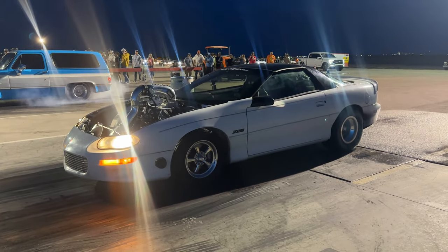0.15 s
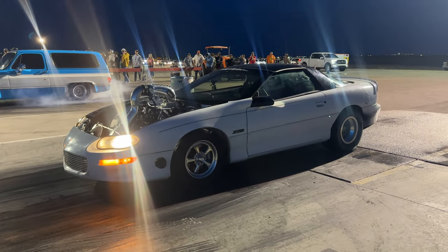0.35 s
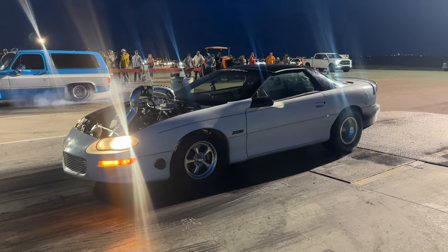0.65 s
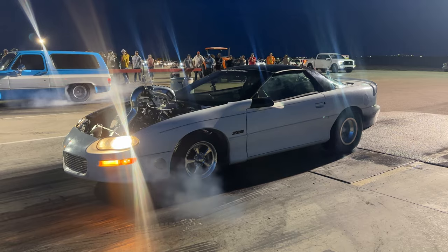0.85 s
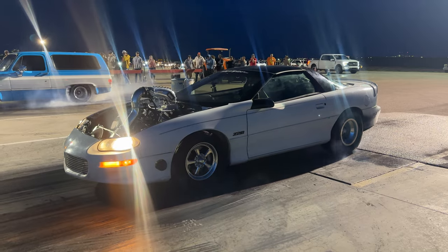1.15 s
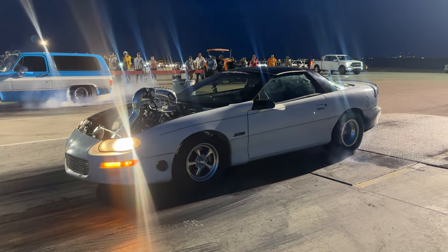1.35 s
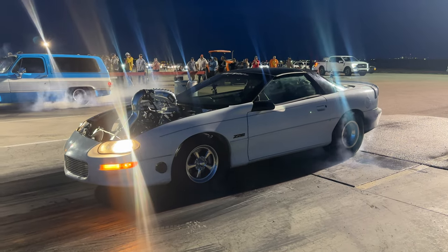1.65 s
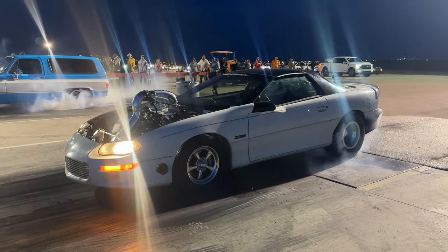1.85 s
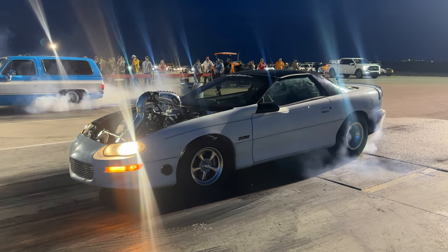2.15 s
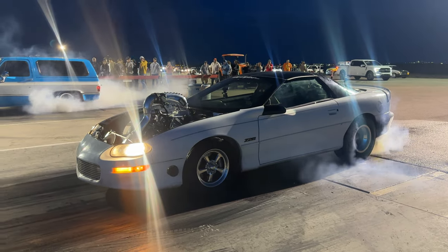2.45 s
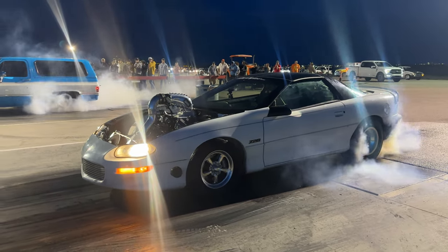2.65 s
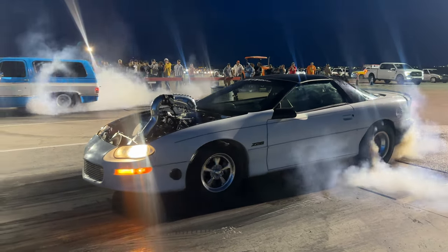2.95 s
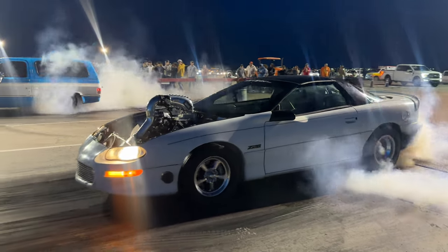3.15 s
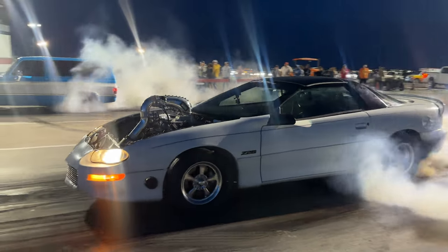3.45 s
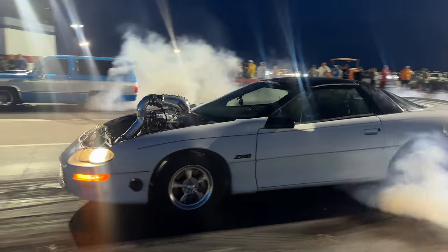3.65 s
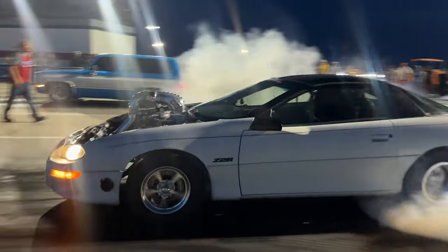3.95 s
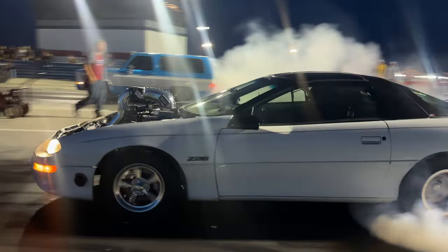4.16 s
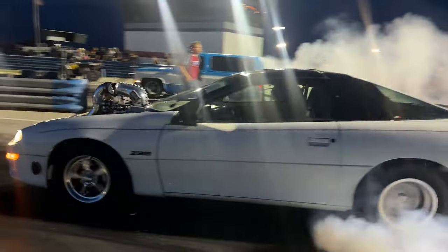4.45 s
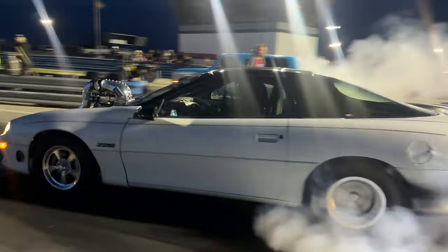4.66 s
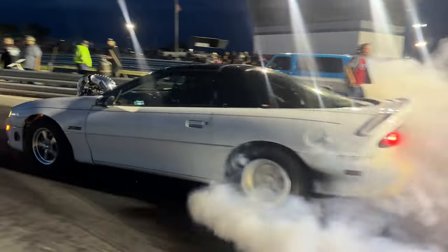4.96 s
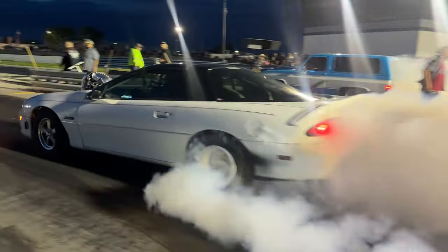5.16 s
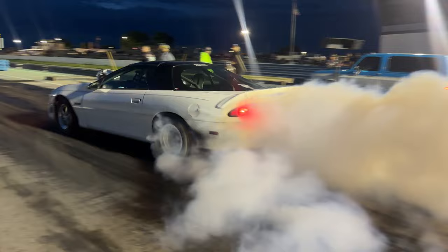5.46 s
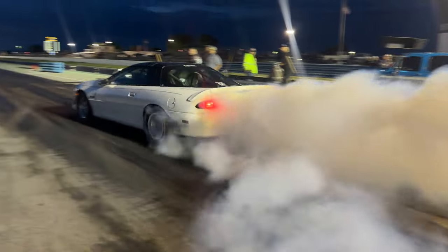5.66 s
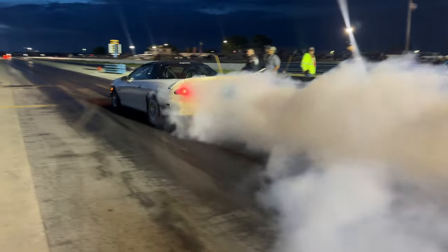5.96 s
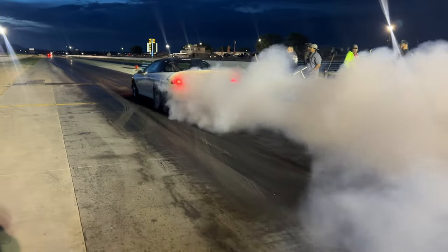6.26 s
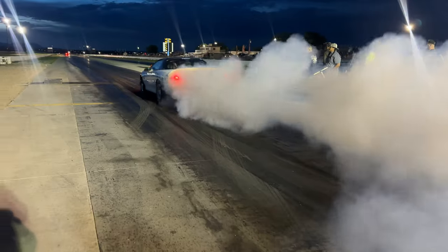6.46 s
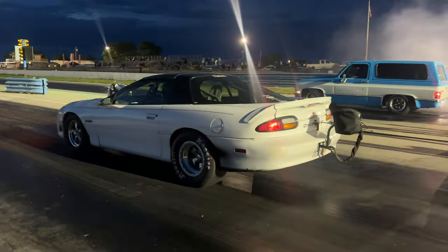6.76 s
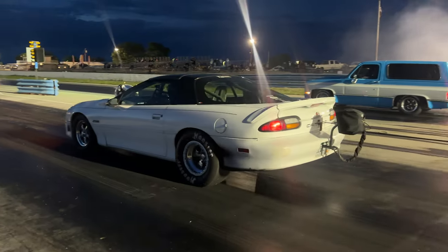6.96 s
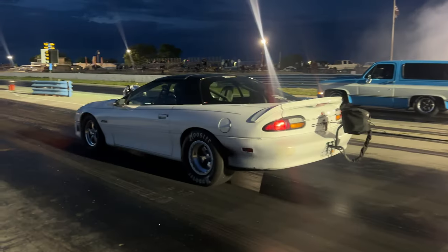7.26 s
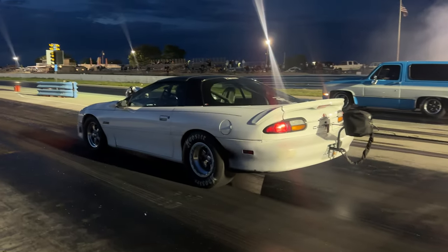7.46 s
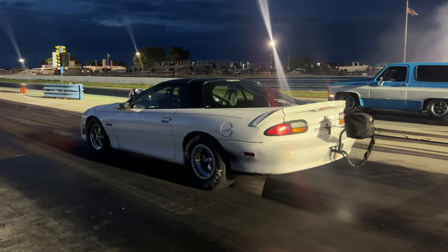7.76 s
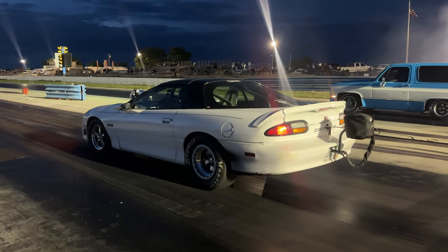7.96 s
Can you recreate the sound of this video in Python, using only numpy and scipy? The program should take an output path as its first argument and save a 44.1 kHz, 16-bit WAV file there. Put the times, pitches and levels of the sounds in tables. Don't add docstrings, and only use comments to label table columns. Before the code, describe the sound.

Lumpy V8 with popping exhaust climbs to a hard steady roar with tyre howl, fades with a short blow-off hiss, then cuts to rough idle.

```python
import sys
import numpy as np
from scipy import signal
from scipy.fft import rfft, irfft, next_fast_len
from scipy.io import wavfile
from scipy.ndimage import uniform_filter1d

SR = 44100
rng = np.random.default_rng(int(sys.argv[2]) if len(sys.argv) > 2 else 0)


def generate_wav(sig):
    pcm = np.round(np.clip(np.atleast_2d(sig).T, -1, 1) * 32767).astype(np.int16)
    wavfile.write(sys.argv[1], SR, pcm)


def boost_factor(decibels):
    exponent = np.asarray(decibels, float) / 20
    return 10 ** exponent


N = 357651
SIZE = next_fast_len(N + SR)
HZ = np.maximum(np.arange(SIZE // 2 + 1) * SR / SIZE, 1)
TIME = np.arange(N) / SR


def rms_one(x):
    return x / np.sqrt(np.mean(x ** 2) + 1e-20)


def in_time(rows):
    s, *columns = np.transpose(rows)
    on = (TIME >= s[0]) & (TIME <= s[-1])
    return [np.interp(TIME, s, column) for column in columns] + [on]


def at_hz(points, hz=HZ):
    table_hz, value = np.array(points).T
    return np.interp(np.log(hz), np.log(table_hz), value)


def colour(x, points, size=8192):
    hz = np.maximum(np.arange(size // 2 + 1) * SR / size, 1)
    cepstrum = irfft(np.log(boost_factor(at_hz(points, hz))), size)
    cepstrum[1:size // 2] *= 2
    cepstrum[size // 2 + 1:] = 0
    taps = irfft(np.exp(rfft(cepstrum)), size)[:size // 2]
    taps = taps.reshape((1,) * (x.ndim - 1) + (-1,))
    return signal.oaconvolve(x, taps, axes=-1)[..., :N]


def butter(x, order, hz, kind):
    return signal.sosfilt(signal.butter(order, hz, kind, fs=SR, output="sos"), x)


def even(x, span_s):
    return x / np.sqrt(uniform_filter1d(x ** 2, int(span_s * SR)) + 1e-9)


def clicks(times, sizes):
    out = np.zeros(N)
    at = np.clip((np.asarray(times) * SR).astype(int), 0, N - 1)
    np.add.at(out, at, sizes)
    return out


def fade(x, t60):
    return signal.lfilter([1], [1, -boost_factor(-60 / (t60 * SR))], x + 1e-18)


def noise_pair():
    return rng.standard_normal((2, N))


def wavering(hz, width_hz):
    slow = signal.lfilter(*signal.butter(1, width_hz / 2, fs=SR), noise_pair())
    carrier = np.exp(2j * np.pi * np.cumsum(hz) / SR)
    return rms_one(np.real((slow[0] + 1j * slow[1]) * carrier))


def mode_poles(hz, width_hz):
    r = np.exp(-np.pi * width_hz / SR)
    return r, [1, -2 * r * np.cos(2 * np.pi * hz / SR), r * r]


def resonance(x, hz, width_hz):
    r, poles = mode_poles(hz, width_hz)
    return signal.lfilter([(1 - r * r) / 2, 0, (r * r - 1) / 2], poles, x)


def hold_back(x, hz, width_hz):
    _, poles = mode_poles(hz, width_hz)
    return signal.lfilter(poles[::-1], poles, x)


# (t/s, engine cycles per s)
SPEED = [(0.05, 26.5), (0.15, 27.9), (0.3, 28.5), (0.43, 29.3), (0.55, 31), (0.66, 31.5), (0.8, 26.3),
         (0.87, 26.4), (1.0, 28.5), (1.1, 29.9), (1.2, 31), (1.3, 34), (1.44, 36.2), (1.57, 39.3),
         (1.65, 42.1), (1.82, 48.5), (1.97, 53.8), (2.05, 55.1), (2.11, 49.2), (2.32, 49.5), (2.62, 47.4),
         (2.78, 42.3), (2.9, 41.6), (3.05, 41.7), (3.47, 46.1), (3.71, 45.5), (3.97, 49.5), (4.24, 51.3),
         (4.55, 50.3), (4.72, 47.8), (4.87, 43.7), (5.02, 40.3), (5.27, 34.4), (5.56, 27.6)]


def crank():
    cycle_hz = in_time(SPEED)[0]
    start_cycle = 0.99
    return cycle_hz, start_cycle + np.cumsum(cycle_hz) / SR


SHUT_S = 5.47


def throttle_db():
    lift_s, length_s, fall_s = 0.675, 0.123, 0.075
    lift = np.clip((TIME - lift_s) / fall_s, 0, 1) * (TIME < lift_s + length_s)
    return -20 * lift - 290 * np.maximum(TIME - SHUT_S, 0)


# (delay/ms, gain)
ECHOES = [
    (1.9, 0.29),
    (5.3, -0.15),
    (9.1, -0.18),
    (14.7, -0.2),
    (23, 0.27),
]


def exhaust(push, pipe, split_hz, breath_db, clean_db, echo_db):
    breath = boost_factor(breath_db) * fade(np.abs(push), t60=0.062) * rng.standard_normal(N)
    burst = breath - (1 - boost_factor(clean_db)) * push
    gas = push + butter(burst, 2, split_hz, "high")
    delay_ms, gain = np.transpose(ECHOES)
    paths = clicks(np.append(0, delay_ms / 1000), np.append(1, gain * boost_factor(echo_db)))
    echoed = signal.oaconvolve(gas, paths[:2000])[:N]
    return even(colour(echoed, pipe), span_s=.13)


# (exhaust level/dB, pipe delay/ms, hiss level/dB, exhaust level from behind/dB)
CYLINDERS = [
    (-11, 1.37, -39, -32),
    (-12.5, 0.49, -9, -25),
    (1.26, 0.83, 6, 1.5),
    (-71, 0.9, -16, -43),
    (1, 0.47, -3.5, 0.5),
    (-3.5, 0.37, -23, -2),
    (-35, 1.67, -18, -40),
    (-2.5, 0.87, -5, -3),
]
BEHIND_S, BEHIND_TAKES_S = 4.6, 0.35


def firings(cycle, far_bank, passed, rough_db):
    slot = np.floor(8 * cycle).astype(int)
    at = np.flatnonzero(np.diff(slot)) + 1
    push_db, delay_ms, spit_db, behind_db = np.array(CYLINDERS)[slot[at] % 8].T
    strength = (1 - passed[at]) * boost_factor(push_db) + passed[at] * boost_factor(behind_db) + far_bank[at]
    luck = rng.standard_normal((len(at), 3)) * rough_db[at, None]
    lope_db = 0.8 * rough_db[at] * rng.standard_normal(400)[slot[at] // 8]
    when = at / SR + (delay_ms + 0.043 * luck[:, 0]) / 1000
    push = clicks(when, strength * boost_factor(luck[:, 1] + lope_db))
    spit = clicks(when, boost_factor(spit_db + 1.2 * luck[:, 2]))
    return push, spit


# (t/s, exhaust level/dB, pipe facing us/dB, share of the far bank)
LOAD = [(0.3, -16, -3.5, -0.063), (0.66, -15, -1, -0.041), (0.87, -21, -1, 0), (1.47, -15.5, 1, -0.14),
        (1.75, -13.5, 1.5, 0.51), (1.99, -10.5, 3, 0.073), (2.11, -10.5, 4, 0.19), (2.3, -14, 4, 0.46),
        (2.6, -15, 2, 0.22), (2.8, -16, 2.5, 0.1), (3.05, -17, 2, -0.055), (3.47, -15.5, -0.5, 0.097),
        (3.8, -16.5, -4.5, -0.078), (4.1, -16.5, -5.5, 0.089), (4.4, -17, -2.5, 0.23),
        (4.65, -19.5, -5, -0.1), (4.91, -24, -5, -0.088), (5.56, -31, -8, -0.29)]
# (engine cycles per s, spread/dB)
ROUGH = [(33, 2.3), (41, 1.7), (42.5, .8), (50, .6)]
# (f/Hz, level/dB per Hz)
PIPE = [(20, -85), (40, -19.5), (70, -2.5), (110, -1), (160, 0), (220, 5), (280, 5.5), (350, 0),
        (450, -9.5), (600, -14.5), (800, -17), (1000, -25), (1200, -28.5), (1420, -22.5), (1650, -41),
        (3000, -59.5)]
# (f/Hz, level/dB per Hz)
RUMBLE = [(18, -53), (30, -36), (80, -10), (194, -26), (276, -6), (462, -18.5), (748, -9.5), (878, -21),
          (1400, -43), (1820, -69), (3080, -120)]
# (f/Hz, level/dB per Hz)
GAS = [(900, -25), (1300, -2), (1700, 3), (2100, 3), (2650, -4.5), (5180, -3), (7350, -8), (8360, -0.5),
       (9490, -4.5), (11300, -35), (12400, -13), (15000, -7.5), (16000, -19), (16500, -77)]
# (t/s, extra path/ms, gain)
BOUNCE = [
    (1.5, 1.1, .05),
    (2.45, 0.87, 0.33),
    (2.85, 1.11, 0.42),
    (3.2, 0.92, 0.37),
    (3.6, 1.2, 0.098),
    (4.3, 0.93, 0.21),
    (4.72, 1.44, 0.17),
    (4.95, 2.46, 0.63),
    (5.2, 2.4, 0.18),
    (5.5, 2.17, 0.26),
]


def loaded_engine():
    cycle_hz, cycle = crank()
    exhaust_db, facing_db, far_bank, _ = in_time(LOAD)
    on = TIME < LOAD[-1][0]
    passed = np.clip((TIME - BEHIND_S) / BEHIND_TAKES_S, 0, 1)
    shut_db = throttle_db()
    exhaust_db = exhaust_db + shut_db
    hiss_db = exhaust_db - 25.5 + 0.53 * facing_db - 0.67 * shut_db * (TIME < SHUT_S) - 2.5 * passed
    boom_db = -0.18 * (cycle_hz - 40) - 0.022 * facing_db + 7 * passed
    boom_db = boom_db - 0.43 * shut_db * (TIME < BEHIND_S)
    bark_db = 4.5 + 0.67 * facing_db
    drone_db = np.interp(TIME, [1.27, 1.27 + 0.19], [4.5, -40])
    rough_db = np.interp(cycle_hz, *np.transpose(ROUGH))
    rough_db = np.where(TIME < 2, rough_db, np.minimum(rough_db, 1.0))

    push, spit = firings(cycle, far_bank, passed, rough_db)
    tone = exhaust(push, PIPE, split_hz=500, breath_db=-43, clean_db=0, echo_db=-10)
    tone = hold_back(tone, hz=250, width_hz=160)
    boom = butter(tone, 2, 185, "low")
    bark = butter(tone, 2, 480, "high")
    tone = tone + (boost_factor(boom_db) - 1) * boom + (boost_factor(bark_db) - 1) * bark
    tone = tone + boost_factor(drone_db) * resonance(tone, hz=286.6, width_hz=29)
    path_ms, bounce, _ = in_time(BOUNCE)
    off_track = np.interp(TIME - path_ms / 1000, TIME, tone)
    tone = (tone + bounce * off_track) / np.sqrt(1 + bounce ** 2)

    rumble = boost_factor(-28 + 7 * rough_db) * rms_one(colour(rng.standard_normal(N), RUMBLE))
    roar = tone + rumble
    roar = roar + passed * (butter(roar, 4, 72, "high") - roar)

    puff = .6 * fade(spit, t60=0.046)
    snap = 1.6 * fade(spit, t60=.006)
    gate = 0.48 + puff + snap
    hiss = rms_one(colour(noise_pair() * even(gate, span_s=.15), GAS))
    return on * boost_factor(exhaust_db + 2.06) * roar, on * boost_factor(hiss_db + 5.0) * hiss


# (t/s, level/dB, f/Hz)
SPOOL = [
    [(0.0, -50, 4050), (0.1, -45, 4150), (0.17, -48, 4200), (0.22, -60, 4250)],
    [(1.33, -60, 6080), (1.37, -50, 6200), (1.44, -51, 6450), (1.54, -60, 6800)],
]


def spool():
    return sum(on * boost_factor(level_db) * wavering(hz, width_hz=86) for level_db, hz, on in map(in_time, SPOOL))


# (t/s, peak level/dB)
POPS = [(0.038, -11), (0.194, -34), (0.265, -12), (0.279, -4), (0.335, -25), (0.506, -29), (0.539, -16),
        (0.571, -26), (0.635, -25), (0.666, -21), (0.689, -20), (0.797, -32), (0.834, -36), (0.919, -6),
        (0.991, -20), (1.026, -22), (1.16, -20.5), (1.193, -36), (1.229, -25), (1.25, -20), (1.287, -35),
        (1.311, -13), (1.378, -32), (1.408, -23), (1.428, -12), (1.456, -10), (1.509, -9), (1.535, -13),
        (1.561, -10), (1.586, -15)]


def pops():
    s, db = np.transpose(POPS)
    push = clicks(s, boost_factor(db - 2))
    spray = fade(push, t60=0.035) * rng.standard_normal(N)
    crack = butter(boost_factor(15) * push + boost_factor(-4) * spray, 2, [400, 1700], "band")
    spit = boost_factor(-21) * fade(push, t60=0.073) * rms_one(colour(rng.standard_normal(N), GAS))
    thud = boost_factor(17.5) * resonance(push, hz=563, width_hz=350)
    return crack + spit + thud


# (t/s, peak level/dB, ring f/Hz)
TICKS = [(0.0397, -22, 4200), (0.079, -23, 4600), (0.1136, -20, 4450), (0.1505, -21, 4300),
         (0.194, -38, 4450), (0.221, -25, 5000), (0.2528, -21, 4500), (0.2654, -23, 4900),
         (0.3137, -33, 4270), (0.397, -26, 4730), (0.431, -23, 4900), (0.4643, -40, 4880),
         (0.4818, -29, 4860), (0.5307, -33, 5310), (0.5637, -25, 5100), (0.5955, -29, 5350),
         (0.627, -25, 5940), (0.6664, -30, 5950), (0.691, -21.5, 5660), (0.7327, -34, 5000),
         (0.769, -33, 4670), (0.8061, -27, 5290), (0.831, -26, 4770), (0.849, -25, 5200),
         (0.8729, -32, 5260), (0.8864, -28, 5070), (0.9098, -36, 5330), (0.918, -41, 4730),
         (0.9423, -23, 4800), (0.96, -28, 5200), (0.9794, -24, 4780), (1.019, -27, 5370),
         (1.049, -21, 4720), (1.084, -23, 4870), (1.1213, -24.5, 5230), (1.154, -23, 5150),
         (1.1857, -36, 5300), (1.218, -24, 5360), (1.2506, -25, 5930), (1.2885, -24, 5300),
         (1.3119, -31, 6860), (1.3688, -38, 5460), (1.408, -28, 6680), (1.4287, -25, 6850),
         (1.457, -28.5, 6770), (1.483, -19, 6480), (1.51, -23, 6590), (1.5359, -39, 6610),
         (1.5614, -29, 5210), (1.5868, -22, 6750)]


def ticks():
    out, age = np.zeros(N + 600), np.arange(600) / SR
    shape = (1 - np.exp(-age / .0003)) * boost_factor(-60 * age / .0075)
    snap = boost_factor(-8) * np.diff(rng.standard_normal((len(TICKS), 601)))
    slide = .93 + 45 * age
    for (s, db, hz), spray in zip(TICKS, snap):
        at = int((s - .001) * SR)
        ring = np.sin(2 * np.pi * hz * slide * age)
        out[at:at + 600] += boost_factor(db + 5.5) * shape * (ring + spray)
    return out[:N]


# (t/s, level/dB, f/Hz)
SURGE = [
    (0.715, -37, 5220),
    (0.735, -33, 5030),
    (0.775, -32, 4700),
    (0.8, -42, 4700),
    (0.815, -55, 4600),
]


def surge():
    level_db, hz, on = in_time(SURGE)
    chop = .3 + .7 * np.maximum(np.sin(2 * np.pi * 88 * TIME), 0) ** 2
    chirp = wavering(hz, width_hz=120)
    partner = 0.5 * wavering(.69 * hz, width_hz=300)
    return on * boost_factor(level_db) * chop * (chirp + partner)


# (t/s, nearness level/dB)
SPIN = [
    (1.4, -24),
    (2.1, -13),
    (3.4, -7),
    (3.9, -1),
    (4.3, -0.5),
    (4.7, -0.5),
    (5.1, -6.5),
    (5.4, -11),
]


def spinning():
    near_db, on = in_time(SPIN)
    hum = boost_factor(-30.5 + 3.4 * near_db) * np.sin(2 * np.pi * crank()[1])
    howl = boost_factor(-44.5 + 2.4 * near_db) * wavering(np.full(N, 2100), width_hz=280)
    rush = boost_factor(-51.5 + 0.2 * near_db) * wavering(np.full(N, 4900), width_hz=1350)
    return on * (hum + howl + rush)


# (t/s, level/dB, throat f/Hz)
BLOW = [
    (5.39, -53.5, 2896),
    (5.42, -38, 2765),
    (5.46, -32.5, 2570),
    (5.49, -31.5, 2236),
    (5.525, -41, 2140),
    (5.535, -53, 2274),
]


def blow_off():
    level_db, throat_hz, on = in_time(BLOW)
    modes = [(.51, -7, 70), (1, -4, 170), (1.47, -3, 190), (1.9, -7, 260)]   # (multiple, level/dB, width/Hz)
    song = sum(boost_factor(db) * wavering(k * throat_hz, width_hz) for k, db, width_hz in modes)
    rush = boost_factor(-13) * rms_one(colour(rng.standard_normal(N), GAS))
    flutter = 1 + 0.47 * np.sin(2 * np.pi * 95 * TIME)
    return on * boost_factor(level_db) * flutter * (song + rush)


GONE_S, SCENE_CHANGE_S = 5.5, 6.788


def settle(first, last, within_s):
    return last + (first - last) * np.exp(-np.maximum(TIME - GONE_S, 0) / within_s)


# (f/Hz, level/dB per Hz)
FAR_TONE = [(18, -46), (30, -17), (49, -16.5), (70, -6.5), (147, -8), (195, -12.5), (500, -35), (650, -57),
            (1100, -120)]
# (f/Hz, level/dB per Hz)
FAR_AIR = [(240, -55), (400, -9.5), (697, -3), (1630, -16.5), (3120, -14.5), (8900, -25), (10200, -25),
           (11300, -50), (12500, -30), (16000, -41)]


def far_car():
    rumble = boost_factor(settle(-32.5, -50, 0.18)) * rms_one(colour(rng.standard_normal(N), FAR_TONE))
    depth = 2 * np.clip((TIME - 5.5) / .6, .25, 1)
    chop = np.maximum(np.sin(2 * np.pi * 33 * TIME), 0) * depth
    turbine = wavering(settle(6200, 2850, 0.4), width_hz=110)
    whistle = boost_factor(settle(-80, -71, 0.3)) * chop * turbine
    air = boost_factor(settle(-57, -71.5, 0.25) + 6.0) * rms_one(colour(noise_pair(), FAR_AIR))
    on = np.clip((TIME - GONE_S) / .03 + 1, 0, 1) * (TIME < SCENE_CHANGE_S)
    return on * (rumble + whistle), on * air


# (t/s, firings per s, exhaust level/dB)
IDLE = [
    (6.787, 79.8, -15),
    (6.971, 74.0, -13.5),
    (7.095, 69.5, -21.5),
    (7.209, 56.9, -19),
    (7.265, 54.5, -18),
    (7.405, 53.2, -20),
    (7.65, 57.5, -19),
    (7.957, 68.9, -15.5),
    (8.11, 72.5, -16),
]
# (t/s, hiss level/dB, ring f/Hz)
PUFFS = [(6.7905, -30, 2366), (6.8147, -29, 2450), (6.8492, -28.5, 2430), (6.877, -26.5, 2920),
         (6.8919, -33, 2540), (6.918, -27.5, 2420), (6.9569, -34.5, 2417), (6.9979, -33.5, 2410),
         (7.0299, -32.5, 2400), (7.07, -44, 2450), (7.2189, -30, 2607), (7.255, -37.5, 2250),
         (7.2746, -30, 2490), (7.313, -30.5, 5820), (7.365, -33, 6000), (7.4074, -33, 5935),
         (7.428, -43, 3400), (7.468, -42.5, 5900), (7.5177, -35, 2460), (7.573, -38, 6030),
         (7.614, -33, 5920), (7.6668, -32, 2310), (7.6988, -29, 4900), (7.7505, -37, 2400),
         (7.8, -31.5, 2427), (7.832, -32, 2454), (7.847, -31.5, 2370), (7.8791, -30.5, 2490),
         (7.9214, -30, 2420), (7.955, -28.5, 4970), (7.996, -30.5, 2420), (8.039, -29.5, 2860),
         (8.0715, -31, 5630), (8.086, -34.5, 2440)]
# (f/Hz, level/dB per Hz)
IDLE_PIPE = [(15, -79), (25, -82), (56, -3), (82, -5.5), (145, -1), (195, -8), (243, -5.5), (413, -22.5),
             (525, -27.5), (642, -18), (943, -21), (1580, -45.5), (2000, -33.5), (2600, -89), (4400, -120)]
# (f/Hz, level/dB per Hz)
IDLE_GAS = [(710, -23), (1200, -2.5), (1650, -9.5), (2450, -3.5), (2670, -8), (3360, -8.5), (4250, -10.5),
            (5820, -13.5), (8830, -8), (11200, -25), (15100, -14.5), (16000, -45), (16500, -44)]


def idling_engine():
    per_s, exhaust_db, on = in_time(IDLE)
    s, puff_db, ring_hz = np.transpose(PUFFS)
    steps = np.maximum(np.round(np.diff(s) * per_s[(s[1:] * SR).astype(int)]), 1)
    slot = np.append(0, np.cumsum(steps))
    push_db = -1.5 + 4.5 * rng.standard_normal(int(slot[-1]) + 1)
    push_db[slot.astype(int)] = 3 + 0.38 * (puff_db + 39.5)
    when = np.interp(np.arange(len(push_db)), slot, s)
    push = clicks(when, boost_factor(push_db))
    tone = exhaust(push, IDLE_PIPE, split_hz=80, breath_db=-35.0, clean_db=-40.0, echo_db=1.0)
    rumble = boost_factor(-13) * rms_one(colour(rng.standard_normal(N), IDLE_PIPE))

    puffs = fade(fade(clicks(s, boost_factor(puff_db - 43.5)), t60=0.016), t60=0.047)
    steady_jet = boost_factor(-51.5)
    hiss = rms_one(colour(noise_pair(), IDLE_GAS)) * (steady_jet + puffs)
    last = np.maximum(np.searchsorted(s, TIME) - 1, 0)
    note = wavering(ring_hz[last], width_hz=250)
    flange = .9 * wavering(np.full(N, 5700), width_hz=700)
    bark = boost_factor(3.0) * wavering(np.full(N, 720), width_hz=53)
    middle = .5 * wavering(np.full(N, 3400), width_hz=300)
    ring = .6 * puffs * (note + flange + bark + middle)
    return on * (boost_factor(exhaust_db + 2.0) * (tone + rumble) + ring), on * hiss


# (t/s, peak level/dB)
KNOCKS = [
    (6.81, -22),
    (6.916, -28),
    (7.027, -28),
    (7.158, -42),
    (7.31, -27),
    (7.46, -30),
    (7.612, -31),
    (7.746, -28),
    (7.876, -24),
    (7.995, -29),
]


def knocks():
    s, db = np.transpose(KNOCKS)
    blow = signal.lfilter([1], [1, -0.9], clicks(s, boost_factor(db + 29)))
    return resonance(blow, hz=648, width_hz=58) + 0.1 * resonance(blow, hz=945, width_hz=32)


# (f/Hz, left leads/radians)
LEAD = [(0, 0), (80, .13), (200, .28), (330, .72), (700, .85), (1720, 3.4), (5860, 13), (8000, 14.2),
        (10300, 14.0), (12500, 7.6), (16500, 6.3)]
# (f/Hz, left minus right level/dB)
LEAN = [(60, .3), (250, -.3), (600, 2.5), (1300, 5), (2600, 3), (5000, 4.5), (9000, .6), (14000, 0)]
# (f/Hz, share common to both)
LIKENESS = [(60, .9995), (300, .998), (700, .97), (1400, .9), (2800, .72), (5500, .74), (10000, .92),
            (15000, .92)]


def ports(common, apart):
    alike = np.clip(at_hz(LIKENESS), 0, 1)
    lead = np.interp(HZ, *np.transpose(LEAD))
    turn = boost_factor(at_hz(LEAN) / 2) * np.exp(.5j * lead)
    same = np.sqrt(alike) * rfft(common, SIZE)
    other = np.sqrt(1 - alike) * rfft(apart, SIZE)
    return irfft([(same + other) * turn, (same - other) / turn], SIZE)[:, :N]


def scene():
    roar, hiss = loaded_engine()
    far, air = far_car()
    idle, puffs = idling_engine()
    tones = roar + spool() + pops() + ticks() + surge() + spinning() + blow_off() + far + idle + knocks()
    noise = hiss + air + puffs
    echo = np.append(np.zeros(90), tones[:-90])
    return ports(tones + noise[0], echo + noise[1])


def band_limit(x):
    return signal.sosfilt(signal.butter(12, 16850, fs=SR, output="sos"), x)


def record(dry):
    rounded = 0.96 * np.tanh(dry / 1.064)
    cut = signal.cheby2(10, 50, 16500, fs=SR, output="sos")
    return band_limit(signal.sosfilt(cut, rounded))


dry = scene()
out = record(dry)
generate_wav(out)
```